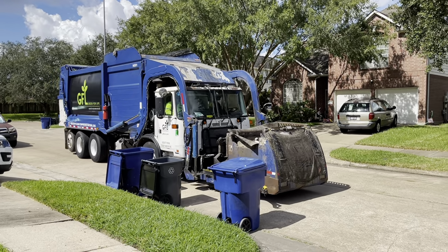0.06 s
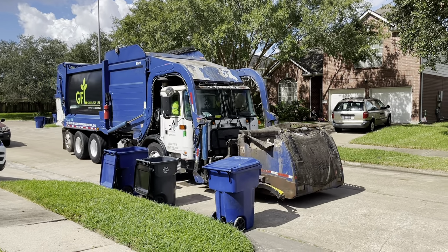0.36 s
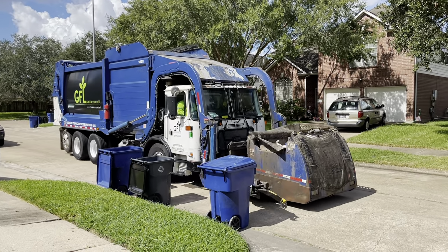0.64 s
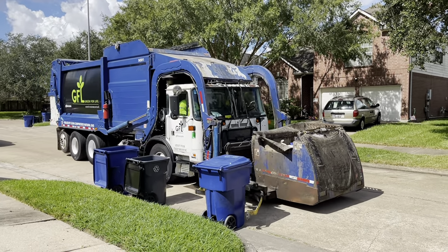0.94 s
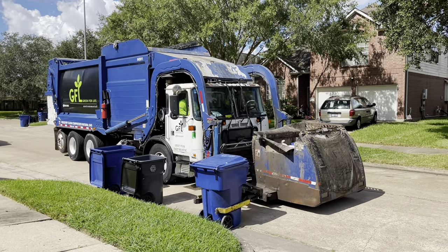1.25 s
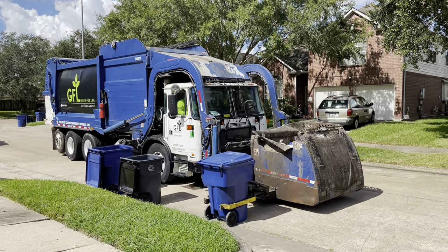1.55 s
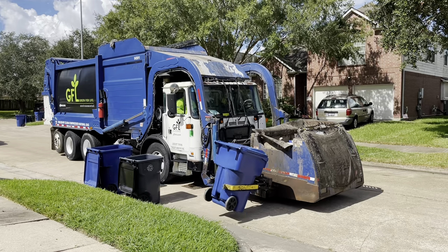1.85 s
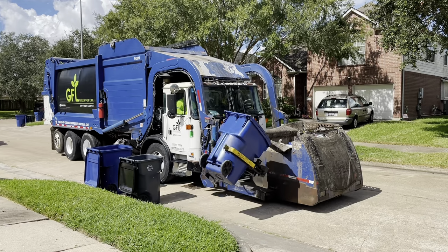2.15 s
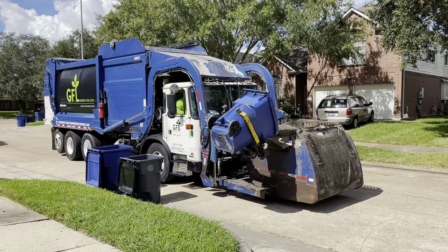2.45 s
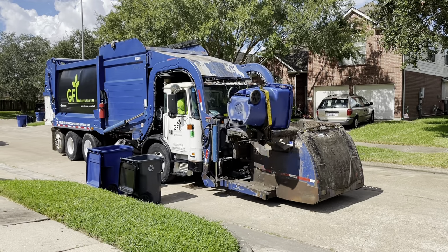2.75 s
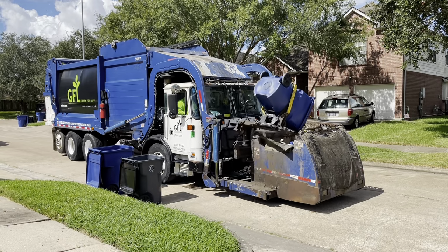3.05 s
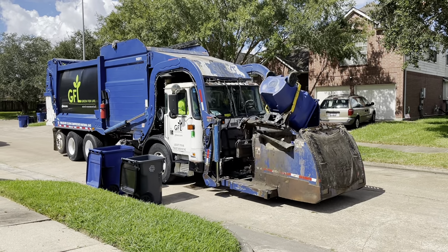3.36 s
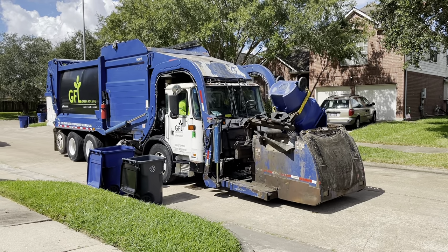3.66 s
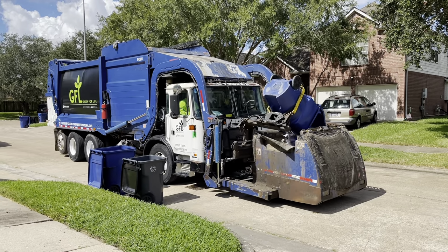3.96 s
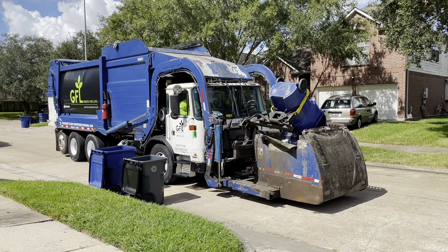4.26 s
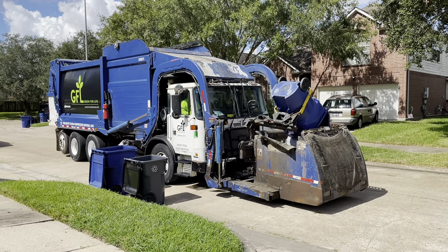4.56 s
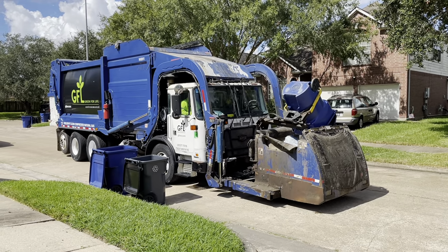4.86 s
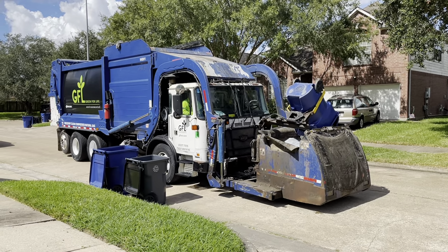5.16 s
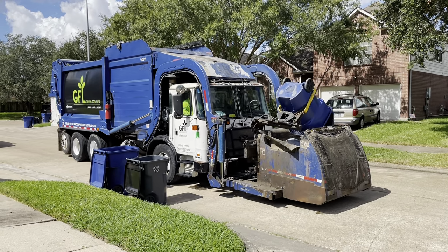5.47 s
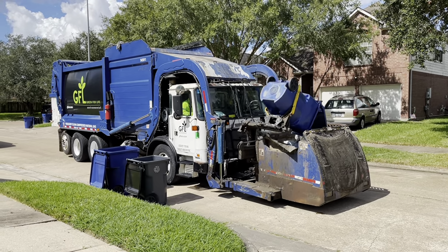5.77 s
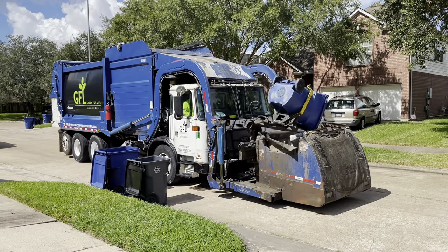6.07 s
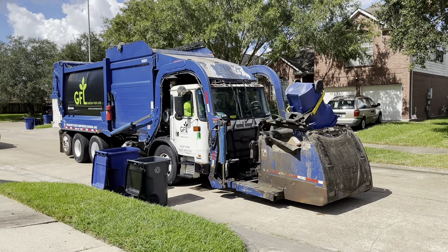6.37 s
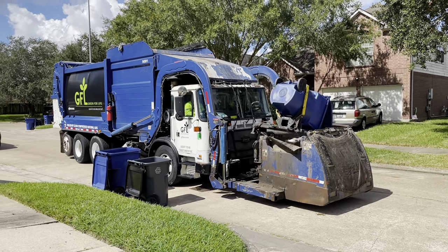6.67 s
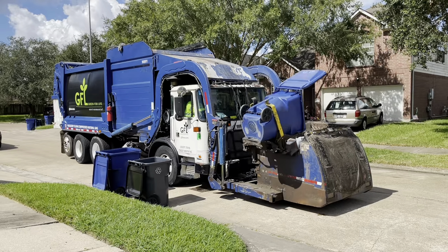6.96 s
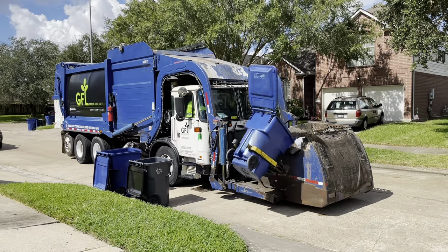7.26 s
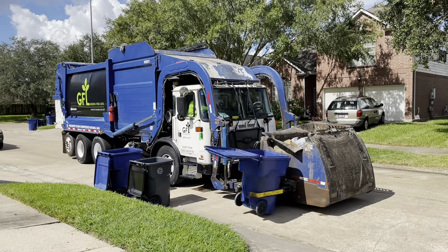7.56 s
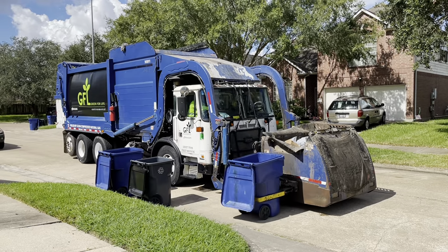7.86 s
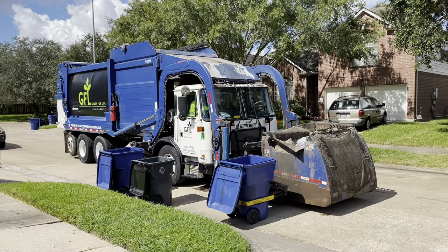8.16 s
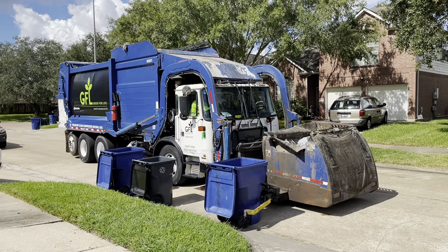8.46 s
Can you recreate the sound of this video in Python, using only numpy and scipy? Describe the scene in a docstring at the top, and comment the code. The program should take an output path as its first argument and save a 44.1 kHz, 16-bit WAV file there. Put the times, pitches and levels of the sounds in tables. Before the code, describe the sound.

Metal clanks, hollow bin thumps and hydraulic whine over a throbbing diesel as a garbage truck stops with a squeal and empties a wheeled bin.

```python
"""A diesel throbs, metal clanks and brakes squeal: a refuse truck stops in a quiet street, a few metres
from a two-port stereo microphone. The hydraulic pump whines as the arm grabs a wheeled bin, shakes it
above the steel hopper and sets it down. Each blow rings the panels and leaves loose metal rattling;
valves hiss, dry pivots squeak, the bin scrapes and refuse tumbles out.
House fronts and trees return a thin echo."""
import sys
import numpy as np
from scipy import signal
from scipy.fft import rfft, irfft
from scipy.io import wavfile
from scipy.ndimage import uniform_filter1d, minimum_filter1d

SR = 44100
rng = np.random.default_rng(int(sys.argv[2]) if len(sys.argv) > 2 else 0)


def dump(signal):
    """Clip the signal to [-1, 1] and save it as 16-bit WAV at the path in sys.argv[1]."""
    limited = np.clip(np.atleast_2d(signal).T, -1, 1)
    pcm = np.round(limited * 32767).astype(np.int16)
    wavfile.write(sys.argv[1], SR, pcm)


N = 384552
T, FREQS = np.arange(N) / SR, np.fft.rfftfreq(N, 1 / SR)


def gain_of(db):
    """Decibels to amplitude."""
    return 10 ** (np.asarray(db) / 20)


def unit_rms(x):
    """Scales to rms 1."""
    return x / np.sqrt(np.mean(x ** 2) + 1e-20)


def curve(points):
    """Joins (f/Hz, value) points on a log-frequency axis."""
    hz, value = np.transpose(points)
    return np.interp(np.log(FREQS + 1), np.log(hz + 1), value)


def add(mix, start, sound):
    """Mixes a sound in from start, in seconds."""
    part = mix[..., max(round(start * SR), 0):][..., :sound.shape[-1]]
    part += sound[..., :part.shape[-1]]


def stretch_of(x, samples):
    """A randomly placed stretch of a scene-long signal."""
    return x[..., rng.integers(N - samples):][..., :samples]


def wander(hz):
    """Random drift of rms 1, up to about hz."""
    return unit_rms(irfft(rfft(rng.standard_normal(N)) / (1 + (FREQS / hz) ** 4), N))


def arch(start, length):
    """A half sine that swells from silence and returns to it."""
    return np.sin(np.pi * np.clip((T - start) / length, 0, 1))


def settling(kicks, settle_s):
    """Power of a shaking that each kick feeds and that dies away in between."""
    return signal.lfilter([1], [1, -np.exp(-2 / (settle_s * SR))], kicks)


def grains(per_s, spread_db):
    """Random contacts of uneven size, heard from two directions."""
    size = gain_of(spread_db * np.minimum(rng.exponential(1, N), 4))
    return size * (rng.random(N) < per_s / SR) * rng.standard_normal((2, N))


def patchy(x, depth_db):
    """Gives every contact a colour of its own: short random patches in time and frequency."""
    spectra = signal.stft(x, nperseg=256)[2]
    patches = uniform_filter1d(rng.standard_normal(spectra.shape[1:]), size=3, axis=0)
    patches = unit_rms(uniform_filter1d(patches, size=8, axis=1))
    return unit_rms(signal.istft(spectra * gain_of(depth_db * np.tanh(patches)))[1][:, :N])


# how alike the truck sounds at the microphone's two ports: f/Hz, correlation
PORT_LIKENESS = [(60, .975), (600, .955), (1400, .74), (6000, .68), (8200, .9), (15000, .88)]


def colour(pair, gain):
    """Gives two unrelated signals one spectrum and makes them as alike as the two ports hear them."""
    a, b = rfft(pair)
    likeness = np.clip(curve(PORT_LIKENESS), 0, 1)
    shared, apart = a * np.sqrt(1 + likeness), b * np.sqrt(1 - likeness)
    return unit_rms(irfft(np.array([shared + apart, shared - apart]) * gain, N))


def noise(gain):
    """Stereo noise of rms 1 with the given spectrum."""
    return colour(rng.standard_normal((2, N)), gain)


# broad colour of struck bin and hopper from a few metres: f/Hz, relative level/dB
CLANG_SPECTRUM = [(35, 10.5), (65, 16), (130, 10.5), (330, 4), (480, -3.5), (800, 1), (1100, -7),
                  (1500, -8.5), (2500, -18.5), (3300, -16.5), (6000, -21.5), (10000, -28), (15000, -38)]
# the hopper's resonances: f/Hz, width/Hz, level/dB above that colour
HOPPER_MODES = [(384, 60, 5.3), (533, 48, 3.4), (747, 75, 0.67), (1498, 120, 5.5), (3295, 990, 5.4),
                (4130, 82, 4.8)]


def hopper(low_hz, high_hz):
    """The response of bin and hopper between two soft band edges."""
    peaks_db = sum(db / (1 + (2 * (FREQS - hz) / width) ** 2) for hz, width, db in HOPPER_MODES)
    rolloff = (1 + (low_hz / (FREQS + 1)) ** 6) * (1 + (FREQS / high_hz) ** 6)
    return gain_of(curve(CLANG_SPECTRUM) + peaks_db) / np.sqrt(rolloff)


def strikes(texture, times, levels_db, rise_s, decay_s, tail_db, tail_s, early_s=.004):
    """Parts graze, then seat; each blow has its own peaks and dips, dies fast and leaves a weak ring."""
    graze_s, graze_db, ripple_db = .012, -19, 5
    out, t = np.zeros((2, N)), T[:SR // 2] - graze_s
    after = np.maximum(t, 0)
    attack = 1 - np.exp(-(after / rise_s) ** 2)
    shape = attack * (np.exp(-(after / decay_s) ** .95) + gain_of(tail_db) * np.exp(-after / tail_s))
    shape = shape / shape.max() + gain_of(graze_db) * np.exp(-(2 * t / graze_s) ** 2)
    for start, db in zip(times, levels_db):
        spectrum = rfft(stretch_of(texture, len(t)))
        ripple = unit_rms(uniform_filter1d(rng.standard_normal(spectrum.shape[1]), size=70))
        burst = irfft(spectrum * gain_of(ripple_db * np.tanh(ripple)), len(t)) * shape
        add(out, start - graze_s - early_s, gain_of(db) * unit_rms(burst) * np.sqrt(np.mean(shape ** 2)))
    return out


def stick_slip(modes, gain_db, jitter_hz, flutter_db, rasp_rad):
    """Friction feeds high modes; each swells, flutters roughly and has faded 30 dB after its length."""
    out, t = np.zeros((2, N)), T[:SR * 2]
    slow = wander(23.7)
    roughness = rasp_rad * wander(104) + .17 * wander(250)
    for start, length, hz, db in modes:
        drift, flutter = stretch_of(slow, len(t)), stretch_of(slow, len(t))
        rasp = stretch_of(roughness, len(t)) + .5 * rng.standard_normal((2, 1))  # a phase for each port
        cycles = np.cumsum(hz + jitter_hz * drift) / SR
        tone = np.sqrt(2) * np.sin(2 * np.pi * cycles + rasp)
        swell_s = .21 * length
        fade_db = -30 * np.maximum(t - swell_s, 0) / (length - swell_s)
        shape = np.minimum(t / swell_s, 1) ** 2 * gain_of(fade_db)
        add(out, start, tone * shape * gain_of(db + gain_db + flutter_db * np.tanh(flutter)))
    return out


# the diesel runs faster and louder under the arm's load: t/s, firing f/Hz, exhaust level/dB
ENGINE_LOAD = [(0, 71.05, -38.5), (3.2, 71.7, -34), (3.5, 77.4, -32), (5.45, 73.4, -29.5),
               (5.62, 73.8, -19.5), (6.3, 77.2, -27), (6.9, 74.5, -21), (7.4, 77.7, -22.5), (8.55, 78, -20),
               (8.72, 74.6, -33)]
# exhaust harmonics: multiple of the firing rate, relative level/dB
EXHAUST_ORDERS = [(.5, -17.5), (1, -4.5), (1.5, -14.5), (2, -23.5)]
# fan, gears and combustion from a few metres: f/Hz, relative level/dB
MACHINE_SPECTRUM = [(24, -42), (36, 0), (60, 0.5), (105, 2), (170, -7.5), (310, -10.5), (460, -20.5),
                    (850, -16), (1450, -20.5), (2500, -29), (3600, -30.5), (6500, -40), (11000, -43),
                    (15500, -57)]


def diesel(machine_db=-28):
    """Six cylinders: the exhaust throbs unevenly and the machine noise pulses with each firing."""
    times, firing_hz, exhaust_db = np.transpose(ENGINE_LOAD)
    firings = np.cumsum(np.interp(T, times, firing_hz) * (1 + .03 * wander(9))) / SR
    throb = 1 + .28 * wander(16)
    note = sum(gain_of(db) * np.cos(2 * np.pi * (k * firings + rng.random())) for k, db in EXHAUST_ORDERS)
    exhaust = unit_rms(note) * gain_of(np.interp(T, times, exhaust_db)) * throb
    machine = patchy(noise(gain_of(curve(MACHINE_SPECTRUM))), depth_db=2)
    pulse = 1 + .1 * np.cos(2 * np.pi * firings)
    return exhaust + machine * pulse * gain_of(machine_db)


def shaking(rest_db, pickup_db, settle_s):
    """Amplitude of loose metal that never quite rests and picks up a share of each blow."""
    times, strength, _, _, weight, *_ = np.transpose(BLOWS)
    kicks = np.zeros(N)
    kicks[np.round(times * SR).astype(int)] = gain_of(strength + weight + pickup_db) ** 2
    return np.sqrt(gain_of(rest_db) ** 2 + settling(kicks, settle_s))


def rattle(clump_db=5):
    """Panels shudder and small loose parts chatter all the time, and harder after each blow."""
    chatter = patchy(colour(grains(per_s=4500, spread_db=1), hopper(278, 23000)), depth_db=5)
    chatter *= shaking(rest_db=-38.5, pickup_db=-11.5, settle_s=.18)
    shudder = noise(hopper(39, 320)) * shaking(rest_db=-36.5, pickup_db=-6, settle_s=.22)
    return shudder + chatter * gain_of(clump_db * np.tanh(wander(15.3)))


# blows of arm, bin and hopper; hardness to ring are relative to strength:
# t/s, strength/dB, hardness/dB, hollow wall/dB, weight/dB, panel ring/dB, panel f/Hz
BLOWS = [(0.137, -9, -17, 3, -17, -25, 886), (0.198, -11.5, -10, 3, -6, -6.5, 559),
         (0.351, -13, -19, 2, -5, -11, 750), (1.202, -2.5, -13.5, 0.5, -18, -10.5, 600),
         (1.273, -11.5, -19, -6, -1.5, -18, 630), (1.325, -6.5, -24, -6, -13, -17, 538),
         (1.429, -10.5, -33, -7, -15, -10, 872), (1.638, -7.5, -17, 1, -31, -6.5, 760),
         (1.891, -7, -37, -0.5, -18, -12, 760), (2.034, -10, -15.5, 3, -10.5, -8, 749),
         (3.055, -8.5, -17.5, -2.5, -11.5, -20, 820), (3.192, -4, -8.5, 1, -16.5, -2, 620),
         (3.391, -5.5, -20.5, -17, -10, -6, 732), (3.479, -3, -16, -3, -15.5, -4, 734),
         (3.556, -3.5, -16.5, -0.5, -14, -13, 808), (3.89, -3.5, -13.5, -5.5, -12.5, -3, 766),
         (4.14, 3, -11.5, -5.5, -17, -11, 718), (4.214, -5.5, -16.5, 1, -13, -17, 810),
         (4.301, -4.5, -12.5, 0, -13.5, 0, 722), (4.498, -12.5, -10.5, -6, -6.5, -10.5, 670),
         (4.961, 0.5, -21.5, -8, -16.5, -12.5, 899), (5.221, -0.5, -17, -8, -14.5, -12, 550),
         (5.665, 0.5, -15, -5, -13.5, -2.5, 743), (5.731, -3, -14.5, -8, -13, -10, 732),
         (5.866, 0.5, -14.5, -3.5, -11, -15, 820), (6.105, -3.5, -12, -2.5, -11.5, -17, 870),
         (6.422, -8, -20, -4.5, -15.5, -7.5, 606), (6.522, -0.5, -17.5, -8, -11, -11, 932),
         (7.637, 0.5, -14, -19, -10, -11, 850), (7.866, -4, -37, -6, -12.5, -11.5, 626),
         (8.077, -16.5, -9.5, -21, -1.5, -2, 966), (8.473, -2, -12.5, -2.5, -19, -6.5, 736)]


def knocks():
    """Steel contacts tick and crack first, the bin's hollow walls answer, the hopper's panels boom last."""
    times, strength, hardness, hollow, weight, *_ = np.transpose(BLOWS)
    contacts = patchy(grains(per_s=11000, spread_db=4), depth_db=5)
    tick = strikes(colour(contacts, hopper(4150, 20000)), times, strength + hardness - 6,
                   rise_s=.0027, decay_s=.0081, tail_db=-20, tail_s=.11, early_s=.0079)
    crack = strikes(colour(contacts, hopper(1610, 5100)), times, strength + hardness - 2,
                    rise_s=.0044, decay_s=.013, tail_db=-26.5, tail_s=.021)
    body = strikes(noise(hopper(510, 1860)), times, strength - 12,
                   rise_s=.0033, decay_s=.026, tail_db=-31, tail_s=.041)
    wall = strikes(noise(hopper(273, 407)), times, strength + hollow - 10,
                   rise_s=.0053, decay_s=.038, tail_db=-23, tail_s=.057)
    boom = strikes(noise(hopper(63, 175)), times, strength + weight - 4,
                   rise_s=.024, decay_s=.062, tail_db=-32, tail_s=.044)
    return tick + crack + body + wall + boom


def panels(rise_s=.0026, t60=.11, db_per_octave=-10, spread=.12):
    """Each blow rings one panel on its own pitch, with a weaker mode below and ever shorter ones above."""
    out, t = np.zeros(N), T[:SR // 3]
    upper = np.arange(2, 6)
    ratios, modes_db = np.r_[.48, 1, upper], np.r_[-8, 0, db_per_octave * np.log2(upper)]
    attack = 1 - np.exp(-(t / rise_s) ** 2)
    for start, strength, *_, ring_db, hz in BLOWS:
        detune, phases = rng.random((2, len(ratios)))
        pitches = hz * ratios * (1 + spread * (detune - .5) * (ratios != 1))
        ring = sum(gain_of(db - 60 * t / t60 * np.sqrt(f / hz)) * np.sin(2 * np.pi * (f * t + phase))
                   for f, db, phase in zip(pitches, modes_db, phases))
        add(out, start, ring * attack * gain_of(strength + ring_db))
    return out


# light clacks of latch and lid: t/s, relative level/dB
LATCH_CLACKS = [(0.175, -23.5), (0.613, -21), (0.7302, -26.5), (1.89, -15), (3.436, -21.5), (3.636, -16.5),
                (3.7269, -16), (4.024, -18), (4.39, -21.5), (5.286, -27), (5.821, -23), (6.0084, -30),
                (6.045, -26), (6.2028, -19), (6.505, -20.5), (6.8334, -17.5), (7.83, -21), (8.255, -26)]


def clacks(ring_db=-5, t60=.063):
    """A small steel part snaps against its stop, rings briefly on its own pitches and nudges the frame."""
    times, levels = np.transpose(LATCH_CLACKS)
    rings, t = np.zeros(N), T[:SR // 8]
    for start, db in LATCH_CLACKS:
        modes_hz = rng.uniform(2784, 3784, (4, 1))
        ring = np.sin(2 * np.pi * modes_hz * t).sum(0) / 2
        add(rings, start, ring * gain_of(db + ring_db - 60 * t / t60))
    snap = strikes(patchy(noise(hopper(1680, 15000)), depth_db=5), times, levels - 2,
                   rise_s=.0024, decay_s=.0062, tail_db=-8, tail_s=.017, early_s=.0033)
    frame = strikes(noise(hopper(270, 3200)), times, levels - 3,
                    rise_s=.0092, decay_s=.04, tail_db=-12.5, tail_s=.039)
    return rings + snap + frame


# bin and hopper squeezed, jolted or set down: t/s, f/Hz, level/dB
WALL_BOOMS = [(0.185, 142, -10), (.2, 242, -13.5), (1.271, 280.4, -5.5), (1.285, 163, -9),
              (1.326, 85, -13.5), (1.43, 250, -9), (3.197, 307, -17.5), (3.893, 363, -9), (4.145, 378, -6),
              (5.225, 274, -14), (6.109, 235, -6.5), (6.524, 121.7, -7.5), (8.476, 414, -4.5)]


def booms(ring_cycles=38, rise_s=.0025, upper_ratio=1.47, upper_db=-11):
    """A wide wall bulges and drums on one low note, with a weaker mode above; higher notes die sooner."""
    out, t = np.zeros(N), T[:SR // 2]
    for start, hz, db in WALL_BOOMS:
        low = np.sin(2 * np.pi * (hz * t + rng.random()))
        upper = gain_of(upper_db) * np.sin(2 * np.pi * (hz * upper_ratio * t + rng.random()))
        shape = (1 - np.exp(-t / rise_s)) * gain_of(db - 60 * t * hz / ring_cycles)
        add(out, start, (low + upper) * shape)
    return out


# the truck pulls up a few metres from the microphone: t/s, length/s, f/Hz, relative level/dB
BRAKE_SQUEALS = [(.3, .5, 9780, -41), (.36, .25, 8085, -34), (.39, .4, 9050, -33), (.45, .35, 7670, -33),
                 (.44, .75, 6328, -22), (.46, 1.3, 9185, -35), (.5, .35, 6085, -33), (.56, 1.2, 9990, -38),
                 (.56, 1.1, 12790, -41), (.76, .3, 8775, -27), (.82, .42, 6332, -25), (.92, .7, 9260, -33),
                 (.97, .3, 8823, -21), (1.27, .26, 6418, -32), (.92, .4, 6950, -43), (.94, .45, 4600, -50),
                 (.58, .4, 10220, -39), (.4, .6, 12650, -45), (.65, .9, 11800, -46)]


def brakes():
    """The brakes stick and slip, feeding one high mode after another."""
    return stick_slip(BRAKE_SQUEALS, gain_db=-2, jitter_hz=9, flutter_db=6, rasp_rad=.25)


# the arm reaches, lifts, tips and lowers: t/s, length/s, first f/Hz, last f/Hz, level/dB
PUMP_STROKES = [(0.8, 0.43, 1095, 1030, -32), (2.11, 0.92, 1024, 1120, -32.3),
                (3.232, 0.57, 1117, 1050, -33), (3.753, 0.378, 1038, 1123, -36),
                (6.95, 0.69, 1820, 1836, -45)]


def pump(sag_db=5.5, edge_s=.014):
    """The hydraulic pump sings one wavering line that glides and weakens through each stroke."""
    out = np.zeros(N)
    wobble, flutter_db = .007 * wander(45), 2 * wander(22)
    for start, length, first_hz, last_hz, db in PUMP_STROKES:
        travel = np.clip((T - start) / length, 0, 1)
        hz = first_hz + (last_hz - first_hz) * np.sqrt(travel)  # fast at first, then settling
        cycles = np.cumsum(hz * (1 + wobble)) / SR
        gate = np.clip(np.minimum(T - start, start + length - T) / edge_s + 1, 0, 1)
        out += gain_of(db - sag_db * travel ** 2 + flutter_db) * gate * np.sin(2 * np.pi * cycles)
    return out


# the bin drags on concrete, refuse slides out of it, the gripper rasps briefly: t/s, length/s, level/dB, low
# f/Hz, high f/Hz
SLIDES = [(1.242, 0.2, -16.5, 45, 9000), (4.914, 0.29, -34, 2450, 15000), (5.678, 0.91, -31, 90, 16000),
          (6.533, 0.12, -26.5, 2300, 16000), (7.106, 0.12, -38, 2400, 9000),
          (7.632, 0.28, -27.5, 90, 12000), (8.058, 0.62, -25, 247, 2700)]


def scrapes(judder_db=4.5):
    """Sliding is a dense run of tiny contacts that swells, judders and stops."""
    contacts = patchy(grains(per_s=7000, spread_db=-1.5), depth_db=4)
    sliding = sum(gain_of(db) * arch(start, length) * colour(contacts, hopper(low_hz, high_hz))
                  for start, length, db, low_hz, high_hz in SLIDES)
    return sliding * gain_of(judder_db * np.tanh(wander(37)))


# the hydraulic valves open: t/s, length/s, level/dB, centre f/Hz, width/octaves
VALVE_OPENINGS = [(2.375, 0.23, -37.5, 4000, 0.43), (2.377, 0.27, -45, 8600, 0.36),
                  (2.643, 0.35, -41.5, 7820, 1), (7.92, 0.56, -39.5, 5100, 0.74)]


def valves():
    """Oil rushes through each opening valve in a band of hiss."""
    out = np.zeros((2, N))
    rush = patchy(rng.standard_normal((2, N)), depth_db=5)
    for start, length, db, hz, octaves in VALVE_OPENINGS:
        band = np.exp(-.5 * (np.log2((FREQS + 1) / hz) / octaves) ** 2)
        out += gain_of(db) * arch(start, length) * colour(rush, band)
    return out


# squeaks from the arm: t/s, length/s, f/Hz, relative level/dB
PIVOT_SQUEAKS = [(2.44, .14, 4010, -39), (4.03, .12, 5800, -37), (6.57, .26, 2552, -30.5),
                 (7.28, .25, 4097, -48)]


def pivots():
    """The arm's dry pivots stick and slip, one short tone at a time."""
    return stick_slip(PIVOT_SQUEAKS, gain_db=3, jitter_hz=8, flutter_db=3, rasp_rad=.35)


# refuse falls from the raised bin: t/s, length/s, level/dB
REFUSE_FALLS = [(3.294, 1.33, -33.5), (5.68, 0.71, -28)]


def tumble(per_s=45, spread_db=3):
    """Cans and bags land one after another on the hopper, each a small crackle of its own colour."""
    sizes = gain_of(spread_db * np.minimum(rng.exponential(1, N), 2))
    hits = sizes * (rng.random(N) < per_s / SR)
    landings = unit_rms(np.sqrt(settling(hits ** 2, settle_s=.02) + 1e-12))
    flow = sum(gain_of(db) * arch(start, length) for start, length, db in REFUSE_FALLS)
    return flow * landings * patchy(noise(hopper(820, 16000)), depth_db=7)


# the gripper rubs and creaks: t/s, length/s, level/dB
GRIPPER_RUBS = [(6.57, .28, -37), (7.655, .45, -41.5)]
# modes of its steel: f/Hz, relative level/dB
GRIPPER_MODES = [(2540, -1), (2790, -4), (3135, -4), (3925, 1), (4613, -4), (4923, -1), (6016, 0)]


def gripper():
    """Each rub makes all the narrow modes of the gripper's steel sing together."""
    modes = [(start, length, hz, db + mode_db)
             for start, length, db in GRIPPER_RUBS for hz, mode_db in GRIPPER_MODES]
    return stick_slip(modes, gain_db=0, jitter_hz=7, flutter_db=4, rasp_rad=.35)


def street_echo(x, t60=.23, delay_s=.031, dull_hz=5000):
    """House fronts and trees scatter a thin, late, duller echo back to the microphone."""
    taps = rng.standard_normal((2, N)) * (rng.random(N) < 1500 / SR)
    taps *= (T > delay_s) * gain_of(-60 * np.minimum(T / t60, 10))
    tail = colour(taps, 1 / np.hypot(1, FREQS / dull_hz))[:, :SR]
    tail *= gain_of(-14) / 2 / np.linalg.norm(tail[0])
    return signal.fftconvolve(x, tail, axes=1)[:, :N]


def scene():
    """The working truck from a few metres; its knocks and friction echo along the street."""
    squeals = brakes() + pivots()
    work = squeals + knocks() + panels() + booms() + clacks() + rattle() + tumble() + scrapes() + gripper()
    return diesel() + pump() + valves() + work + street_echo(work)


# phase between the microphone's ports: f/Hz, left lead/rad
PORT_LEAD = [(0, 0), (2200, 0), (3200, .3), (5000, .2), (6600, -.9), (8200, -3.1), (11500, -6.2),
             (15200, -9.4)]
# balance between them: f/Hz, left minus right level/dB
PORT_TILT = [(250, -1), (1100, 3), (2200, 2.5), (8000, -0.5)]


def record(dry, ceiling=.92, top_hz=15900):
    """The microphone: two ports that differ in phase and level, a fast limiter, then the band limit."""
    hz, lead = np.transpose(PORT_LEAD)
    left = gain_of(curve(PORT_TILT) / 2) * np.exp(.5j * np.interp(FREQS, hz, lead))
    heard = irfft(rfft(dry) * np.array([left, 1 / left]), N)
    allowed_gain = np.minimum(1, ceiling / (abs(heard).max(0) + 1e-9))
    limited = heard * uniform_filter1d(minimum_filter1d(allowed_gain, size=60), size=60)
    lowpass = signal.firwin(511, top_hz, window=("kaiser", 9), fs=SR)
    return signal.oaconvolve(limited, lowpass[None], "same")


dry = scene()
out = record(dry)
dump(out)
```